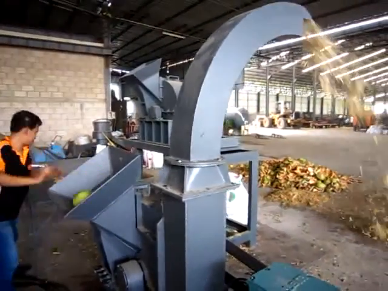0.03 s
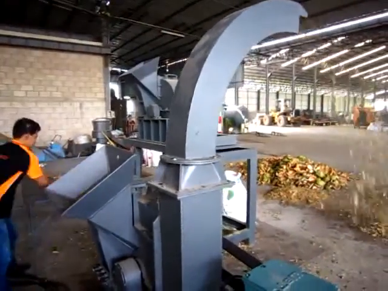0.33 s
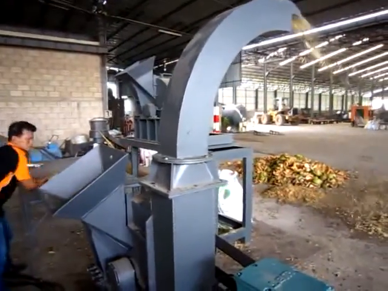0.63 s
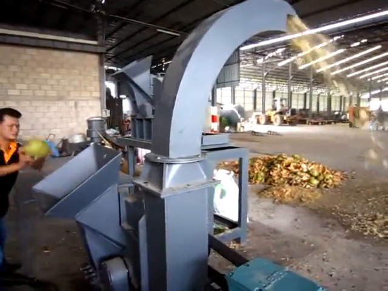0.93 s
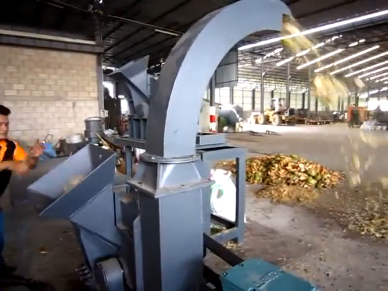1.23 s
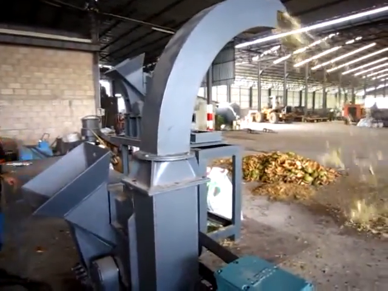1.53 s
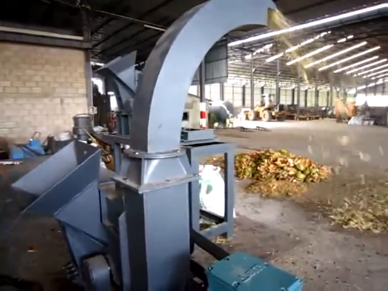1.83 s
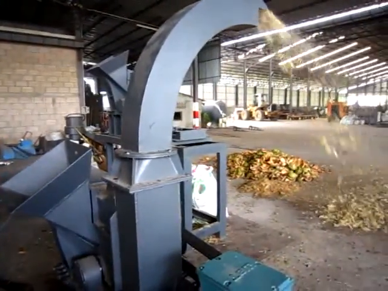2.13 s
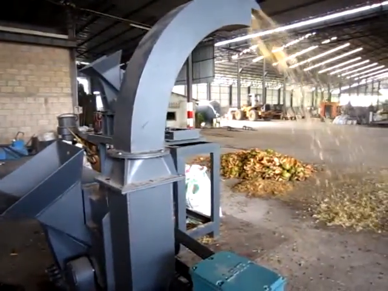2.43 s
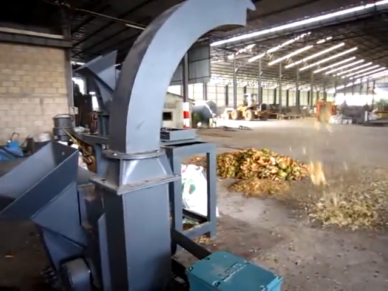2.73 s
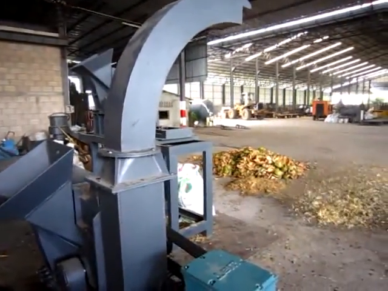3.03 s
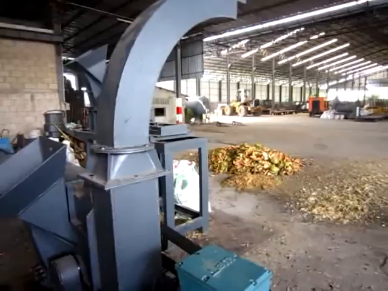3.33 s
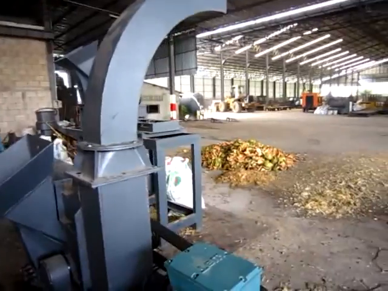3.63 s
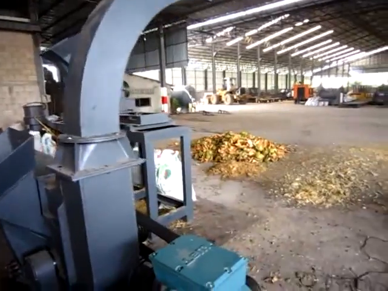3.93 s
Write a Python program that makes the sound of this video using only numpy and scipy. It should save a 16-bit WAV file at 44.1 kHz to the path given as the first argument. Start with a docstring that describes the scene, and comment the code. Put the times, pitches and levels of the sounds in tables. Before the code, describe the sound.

A large chopping machine grinds up a coconut, then drones on empty.

```python
"""Coconut chopper in an open shed

A belt-driven two-knife rotor throbs once a turn and blows air through its steel housing. For two seconds
a coconut is ground: the knives bite, shreds and shell strike the chute, the hopper booms and fibre
hisses from the spout. The listener steps from hopper to spout as the machine drones on empty.
Near the end the drone skips with a click."""
import sys
import numpy as np
from scipy import signal
from scipy.fft import rfft, irfft
from scipy.io import wavfile

SR = 44100
rng = np.random.default_rng(int(sys.argv[2]) if len(sys.argv) > 2 else 0)


def wav_record(signal):
    """Record a signal, one row per channel, as 16-bit PCM in the file named by sys.argv[1]."""
    frames = np.transpose(np.atleast_2d(signal))
    bounded = np.clip(frames, -1, 1)
    # unit amplitude maps onto the largest positive 16-bit level
    quanta = np.round(bounded * 32767).astype(np.int16)
    wavfile.write(sys.argv[1], SR, quanta)


N = 176400
TIME_S = np.arange(N) / SR
FREQ_HZ = np.maximum(np.arange(N // 2 + 1) * SR / N, 1)


def amp(db):
    """Amplitude grows tenfold every 20 dB."""
    return 10 ** (np.asarray(db) / 20)

def unit(x):
    """Normalisation to an rms of 1."""
    return x / np.std(x)

def curve(rows):
    """Linear interpolation of (time_s, value) rows."""
    return np.interp(TIME_S, *np.array(rows).T)

def minimum_phase(gain):
    """Causality: folding the cepstrum gives a struck body's response from its gains, 0 Hz upward."""
    cepstrum = irfft(np.log(gain))
    half = len(cepstrum) // 2
    cepstrum[1:half] *= 2
    cepstrum[half + 1:] = 0
    return np.exp(rfft(cepstrum))

def resonance(hz, width_hz):
    """Response of a damped oscillator, gain 1 at its centre."""
    return 1 / (1 + 1j * (FREQ_HZ ** 2 - hz * hz) / (FREQ_HZ * width_hz))

def colour(x, spectrum):
    """Minimum-phase filtering by (frequency_hz, gain_db) rows."""
    hz, db = np.array(spectrum).T
    gain = amp(np.interp(np.log(FREQ_HZ), np.log(hz), db))
    return irfft(rfft(x) * minimum_phase(gain), N)

def wander(rate_hz):
    """Random modulation: Gaussian values joined by straight lines."""
    return np.interp(TIME_S * rate_hz + rng.random(), np.arange(512), rng.standard_normal(512))

def strokes(turn, angle_turns, scatter_db, jitter_s):
    """A quasi-periodic impulse train: one uneven blow a turn, at a set angle."""
    due = np.interp(np.arange(1, int(turn[-1])) + angle_turns, turn, np.arange(N))
    timing, strength = rng.standard_normal((256, 2))[:len(due)].T
    out = np.zeros(N)
    out[np.clip(due + timing * jitter_s * SR, 0, N - 1).astype(int)] = amp(scatter_db * strength)
    return out


# rotor speed: time_s, turns_per_s
ROTOR_SPEED = [(0, 52.85), (.25, 52.74), (.55, 52.68), (.85, 52.63), (1.15, 52.66), (1.45, 52.73),
               (1.8, 52.68), (2.1, 52.7), (2.6, 52.8), (3.2, 52.82), (4, 52.83)]
def rotation():
    """The rotor's angle, in turns, is the integral of its speed."""
    return .25 + np.cumsum(curve(ROTOR_SPEED)) / SR

# grinding strength as the nut goes through the knives: time_s, level_db
GRINDING_LEVEL = [(0, -26.5), (.12, -36), (.255, -33), (.31, -23.5), (.38, -29), (.47, -22), (.56, -27),
                  (.67, -19.5), (.71, -25.5), (.75, -20), (.82, -23.5), (.97, -22), (1.03, -24),
                  (1.08, -22), (1.2, -22.5), (1.28, -24.5), (1.34, -31), (1.48, -27.5), (1.58, -23.5),
                  (1.7, -21), (1.8, -22.5), (1.93, -22), (2.0, -20.5), (2.06, -31.5), (2.13, -28),
                  (2.2, -36.5), (2.5, -39.5), (2.9, -45)]
def grinding_load():
    """Amplitude envelope shared by bites, shreds and chips."""
    return amp(curve(GRINDING_LEVEL))

# rotor tones beside the spout: harmonic, relative_db
SPOUT_TONES = [(1, -15.5), (2, 3), (3, -3), (4, 0.5), (5, -10.5), (6, -12), (7, -6.5), (8, -11), (9, -28),
               (10, -11), (11, -15.5), (12, -8.5), (13, -19), (14, -22), (15, -21), (16, -22), (17, -23.5),
               (18, -32), (19, -26.5), (20, -16.5), (21, -17), (22, -23.5), (23, -24), (24, -31),
               (25, -27.5), (26, -36.5), (27, -46), (28, -32.5), (29, -33.5), (30, -32.5), (31, -40),
               (32, -52.5), (33, -42), (34, -49), (35, -39.5), (36, -46), (37, -42.5), (38, -36.5),
               (39, -40), (40, -38.5), (41, -41.5), (42, -49)]
# the lower tones nearer the hopper: harmonic, relative_db
HOPPER_TONES = [(1, -13), (2, 1.5), (3, -3.5), (4, -1.5), (5, -13), (6, -11), (7, -5.5), (8, -14.5),
                (9, -15), (10, -11.5), (11, -16.5), (12, -11.5), (13, -22), (14, -30), (15, -25.5),
                (16, -28), (17, -23.5), (18, -25), (19, -22.5), (20, -31), (21, -23), (22, -24.5),
                (23, -21.5)]
# strength of the drone: time_s, level_db
DRONE_LEVEL = [(0, -14.5), (.2, -14.5), (.45, -16.5), (.9, -18), (1.2, -15), (1.5, -15.5), (1.9, -17),
               (2.15, -18.5), (2.45, -17), (2.7, -15), (2.9, -17), (3.3, -16.5), (4, -17)]
DISPERSION_S_PER_KHZ, CASING_HZ, CASING_WIDTH_HZ = .002497, 365, 18
WAVER_IDLE, WAVER_LOADED, WAVER_FULL_HZ = .022, .67, 700
STEP_MIDDLE_S, STEP_LENGTH_S = 2.16, 1
SKIP_AT_S, SKIP_AHEAD_S, SKIP_FADE_S = 3.4235, .004, .00067
THIN_FROM_S, THIN_DB_PER_S, THIN_HZ, THIN_WIDTH_HZ = 3.5, -2.5, 384, 120
def rotor(turn, load):
    """A pressure pulse each turn forms a harmonic series, dispersed by the duct and wavering under load."""
    harmonics, spout_db = np.array(SPOUT_TONES).T
    hopper_db = np.r_[np.array(HOPPER_TONES)[:, 1], spout_db[len(HOPPER_TONES):]]
    near_hopper = np.clip(.5 - (TIME_S - STEP_MIDDLE_S) / STEP_LENGTH_S, 0, 1)
    skipped = np.clip(.5 + (TIME_S - SKIP_AT_S) / SKIP_FADE_S, 0, 1)
    pulse = minimum_phase(amp(np.r_[spout_db[0], spout_db, spout_db[-1]]))[1:-1]
    waver = WAVER_IDLE + WAVER_LOADED * load / load.max()
    thin_db = THIN_DB_PER_S * np.maximum(TIME_S - THIN_FROM_S, 0)  # low-middle tones fade at the end
    out = np.zeros(N)
    for harmonic, partial, hopper_gain in zip(harmonics, pulse, amp(hopper_db - spout_db)):
        hz = harmonic * ROTOR_SPEED[0][1]
        duct_lag = np.pi * DISPERSION_S_PER_KHZ * hz * hz / 1000
        # the casing delays tones near its resonance
        casing_lag = 2 * np.arctan2(hz * CASING_WIDTH_HZ, CASING_HZ ** 2 - hz * hz)
        tone = partial * np.exp(1j * (2 * np.pi * harmonic * turn - duct_lag - casing_lag))
        position_gain = 1 + (hopper_gain - 1) * near_hopper
        unsteady = 1 + waver * min(hz / WAVER_FULL_HZ, 1) * (wander(7) + 1j * wander(7))
        skip = 1 + skipped * (np.exp(2j * np.pi * hz * SKIP_AHEAD_S) - 1)
        thinning = amp(thin_db * np.exp(-((hz - THIN_HZ) / THIN_WIDTH_HZ) ** 2))
        out += (tone * position_gain * unsteady * skip * thinning).real
    return unit(out) * amp(curve(DRONE_LEVEL))

# air rushing through the housing: frequency_hz, gain_db
AIR_SPECTRUM = [(20, -19.5), (60, -7), (100, 0.5), (240, 3.5), (450, -4.5), (700, -10), (950, -13),
                (1200, -10.5), (1450, -21), (1750, -21), (2100, -20), (2400, -27.5), (3300, -38.5),
                (4600, -47), (6000, -59), (7500, -70), (15000, -66.5)]
AIR_DB, AIR_PULSING = -31, .19
def draught(turn):
    """Broadband flow noise, amplitude-modulated once a turn."""
    flow = rng.standard_normal(N) * (1 + AIR_PULSING * np.cos(2 * np.pi * turn))
    return unit(colour(flow, AIR_SPECTRUM)) * amp(AIR_DB + .6 * wander(6))

RATTLE_HZ, RATTLE_WIDTH_HZ, RATTLE_DB = 2110, 120, -56.5
def rattle(turn):
    """Impulse excitation: a loose part ticks and rings once a turn."""
    ticks = strokes(turn, .6, scatter_db=2.5, jitter_s=.000074)
    ring = irfft(rfft(ticks) * resonance(RATTLE_HZ, RATTLE_WIDTH_HZ) ** 2, N)
    return unit(ring) * amp(RATTLE_DB)

# modes of the steel housing: pitch_hz, width_hz, gain_db
HOUSING_MODES = [(372, 27, -1.5), (614, 88, -0.5), (1170, 110, 0.5), (1964, 130, 3.5)]
def housing(x):
    """Forced vibration: the steel panels add their ring to the direct sound."""
    modes = sum(amp(db) * resonance(hz, width) for hz, width, db in HOUSING_MODES)
    return irfft(rfft(x) * (1 + modes), N)

# tearing husk: frequency_hz, gain_db
BITE_SPECTRUM = [(60, -24), (150, -14), (240, -1), (370, 1.5), (480, -2), (630, 1.5), (850, -18),
                 (1250, -5), (1550, -13), (2100, -28), (2800, -32.5), (4500, -45), (7500, -71.5),
                 (15000, -70)]
BITE_DB, SECOND_KNIFE_DB, TEAR_DECAY_S = -8, -5, .002
def knives(turn, load):
    """Two knives bite alternately; each tear is a noise burst with exponential decay."""
    second = strokes(turn, 0, scatter_db=3.5, jitter_s=.0008) * amp(SECOND_KNIFE_DB)
    first = strokes(turn, .5, scatter_db=3.5, jitter_s=.0008)
    envelope = signal.lfilter([1], [1, -np.exp(-1 / (TEAR_DECAY_S * SR))], first + second)
    tears = envelope * rng.standard_normal(N)
    return unit(housing(colour(tears, BITE_SPECTRUM))) * load * amp(BITE_DB)

# shreds hitting the chute: frequency_hz, gain_db
SHRED_SPECTRUM = [(80, -27.5), (230, 5), (600, -1), (900, 1.5), (1300, -3.5), (1550, -8), (2150, -13),
                  (2500, -15.5), (3400, -25), (4700, -33.5), (6000, -46), (7700, -64), (10000, -60),
                  (15500, -68)]
SHRED_DB, SHREDS_PER_S, SHRED_SCATTER_DB, SHRED_PULSING = -3.5, 3000, 2, .3
def shreds(turn, load):
    """Shot noise: shreds pelt the chute at a rate that rises as each knife passes."""
    rate = SHREDS_PER_S * (1 + SHRED_PULSING * np.cos(4 * np.pi * turn))
    arrivals = rng.random(N) < rate / SR
    sizes = amp(SHRED_SCATTER_DB * np.minimum(rng.exponential(size=N), 2))
    hits = arrivals * sizes * rng.choice([-1, 1], N)
    return unit(housing(colour(hits, SHRED_SPECTRUM))) * load * amp(SHRED_DB + .9 * wander(35))

# modes of the chute wall: pitch_hz, width_hz, level_db
CHUTE_MODES = [(1184, 55, -6), (1270, 92, -6.5), (1867, 67, -2), (2004, 90, 2), (2080, 110, -4.5),
               (2780, 150, -15.5), (4330, 330, -15)]
# soft contact dulls the treble: frequency_hz, gain_db
CONTACT_SPECTRUM = [(4500, 0.5), (6000, -16.5), (7700, -37), (15000, -40)]
PING_DB, PINGS_PER_S, PING_SCATTER_DB = -14, 260, 2
def shell_pings(load):
    """Modal superposition: each chip of shell rings the chute in its own mix of modes."""
    arrivals = rng.random(N) < PINGS_PER_S / SR
    hits = arrivals * amp(PING_SCATTER_DB * np.clip(rng.standard_normal(N), -2, 2))
    ring = sum(amp(db) * resonance(hz, width) / width * rfft(hits * rng.standard_normal(N))
               for hz, width, db in CHUTE_MODES)
    return unit(colour(irfft(ring, N), CONTACT_SPECTRUM)) * load * amp(PING_DB)

# boom of the hopper as the nut tumbles on the knives: time_s, level_db
BOOM_LEVEL = [(0, -44), (.25, -52), (.3, -26.5), (.47, -32), (.56, -32), (.67, -22), (.8, -36.5),
              (1.0, -25), (1.15, -39), (1.3, -45), (1.6, -36), (2.0, -38), (2.2, -52), (2.6, -63)]
BOOM_HZ, BOOM_WIDTH_HZ = 613, 110
def hopper_boom(turn):
    """Resonance: the rotor bats the nut and the hopper answers with a hollow note."""
    blows = strokes(turn, .25, scatter_db=3.5, jitter_s=.003)
    blows += strokes(turn, .75, scatter_db=4.5, jitter_s=.003)
    ring = irfft(rfft(blows) * resonance(BOOM_HZ, BOOM_WIDTH_HZ) ** 2, N)
    return unit(ring) * amp(curve(BOOM_LEVEL))

# strength of the fibre spray: time_s, level_db
SPRAY_LEVEL = [(0, -63.5), (.255, -82), (.27, -58), (.4, -57.5), (.47, -57), (.55, -53), (.62, -49.5),
               (.72, -49), (.79, -53), (.87, -48.5), (1.0, -55), (1.18, -49.5), (1.32, -55), (1.55, -56),
               (1.65, -51), (1.68, -48), (1.85, -47.5), (2.05, -50), (2.2, -60.5), (2.5, -71.5), (2.9, -92)]
# hiss of the fibre: frequency_hz, gain_db
FIBRE_SPECTRUM = [(1200, -19.5), (2300, 1.5), (3600, -4.5), (4400, -2.5), (5200, -12), (6200, -17.5),
                  (7000, -27), (7800, -38), (9000, -31), (11000, -30), (15500, -42)]
def fibre_spray():
    """Fine fibre leaves the spout as a hiss that flutters by random modulation."""
    hiss = unit(colour(rng.standard_normal(N), FIBRE_SPECTRUM))
    return hiss * amp(curve(SPRAY_LEVEL) + 1.5 * wander(70))

# heavy chunks of shell thump the housing: start_s, level_db
THUMP_HITS = [(.295, -29), (.44, -29), (.632, -28), (.669, -17), (.728, -27), (.945, -25.5), (1.075, -30),
              (1.26, -28.5), (1.405, -29.5), (1.77, -21.5), (1.98, -21.5), (2.0, -32), (2.115, -41)]
# dull colour of a thump: frequency_hz, gain_db
THUMP_SPECTRUM = [(100, -14), (230, 3.5), (420, -2.5), (630, -5), (900, -1.5), (1200, 0.5), (1600, -7),
                  (2100, -4), (2700, -19), (7000, -54), (15000, -78)]
# hard pieces knock on the chute: start_s, level_db
KNOCK_HITS = [(.456, -37), (.595, -36.5), (.845, -33.5), (1.142, -38), (1.409, -37.5), (1.661, -28),
              (1.805, -37.5), (2.096, -37), (2.205, -44), (2.29, -49)]
# bright colour of a knock: frequency_hz, gain_db
KNOCK_SPECTRUM = [(200, -7.5), (900, -4), (2000, 2.5), (3200, 1), (5500, -11.5), (7700, -39), (11000, -36),
                  (15500, -38)]
def impacts(hits, spectrum, attack_s=.004, decay_s=.014):
    """Transient excitation: pieces shatter on the steel in noise bursts that ring the housing."""
    envelope = np.zeros(N)
    for start_s, db in hits:
        age_s = TIME_S - start_s
        envelope += amp(db) * np.clip(age_s / attack_s, 0, 1) * np.exp(-np.abs(age_s) / decay_s)
    crunch = rng.standard_normal(N)
    steady_rms = np.std(housing(colour(crunch, spectrum)))
    return housing(colour(crunch * envelope, spectrum)) / steady_rms

SHED_T60_S, SHED_DB = .69, -5.5
def shed(x):
    """Reverberation: floor and tin roof return an exponentially decaying tail."""
    tail = rng.standard_normal(SR) * np.exp(-np.log(1000) * TIME_S[:SR] / SHED_T60_S)
    return x + amp(SHED_DB) * signal.fftconvolve(x, tail / np.linalg.norm(tail))[:N]

CLICK_DB, CLICK_CORNER_HZ = -15, 400
def click():
    """A low-passed impulse: one dry click where the drone skips."""
    impulse = np.zeros(N)
    impulse[int(SKIP_AT_S * SR)] = amp(CLICK_DB)
    return signal.lfilter([1], [1, -np.exp(-2 * np.pi * CLICK_CORNER_HZ / SR)], impulse)


def scene():
    """Superposition of all sources in mono; only the grinding reverberates."""
    turn = rotation()
    load = grinding_load()
    pieces = impacts(KNOCK_HITS, KNOCK_SPECTRUM) + impacts(THUMP_HITS, THUMP_SPECTRUM)
    grinding = shed(knives(turn, load) + shreds(turn, load) + shell_pings(load) + pieces)
    running = rotor(turn, load) + draught(turn) + rattle(turn)
    return (running + grinding + hopper_boom(turn) + fibre_spray() + click())[None]

FADE_S, TOP_HZ = .003, 15700
def record(dry):
    """Tapering and band limiting: both ends fade and a steep low-pass cuts the top."""
    edge_s = np.minimum(TIME_S, TIME_S[::-1])
    eased = dry * np.sin(np.pi / 2 * np.minimum(edge_s / FADE_S, 1)) ** 2
    return signal.sosfilt(signal.ellip(8, .2, 70, TOP_HZ, fs=SR, output="sos"), eased)


dry = scene()
out = record(dry)
wav_record(out)
```